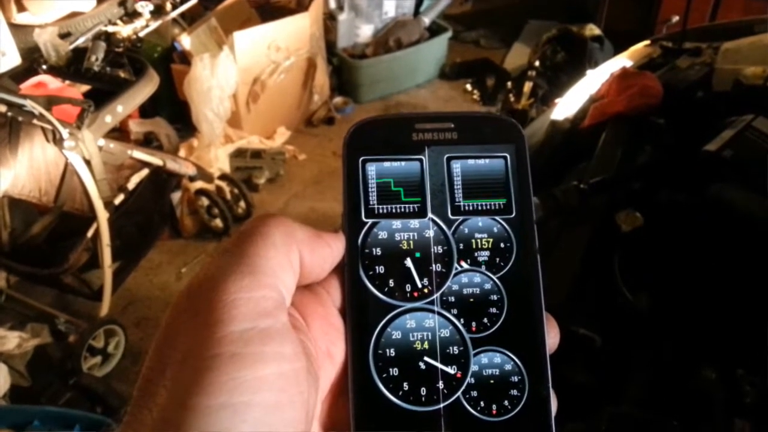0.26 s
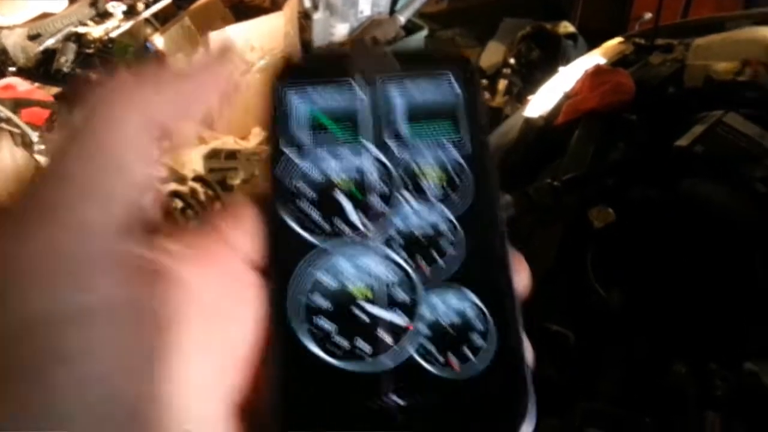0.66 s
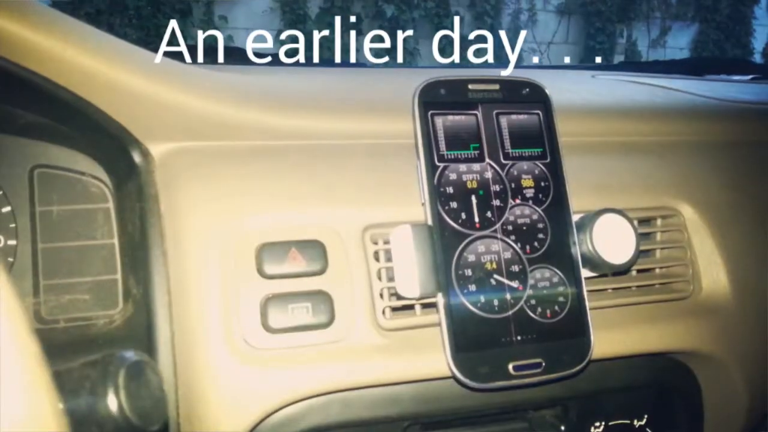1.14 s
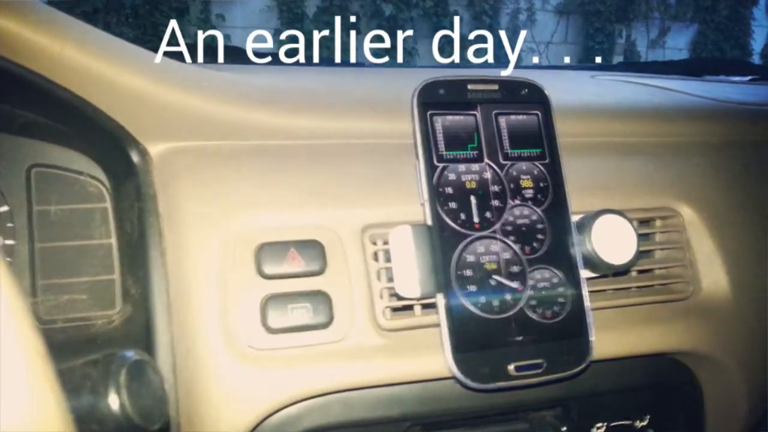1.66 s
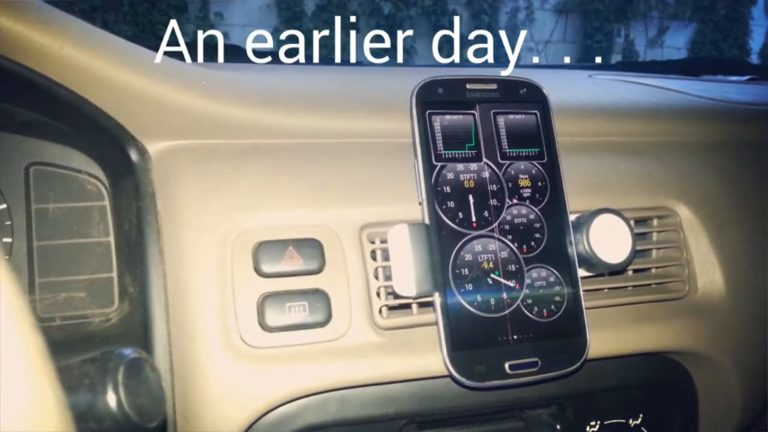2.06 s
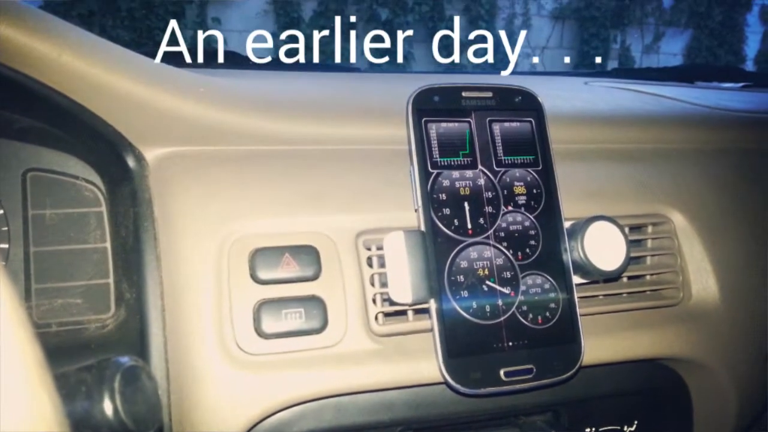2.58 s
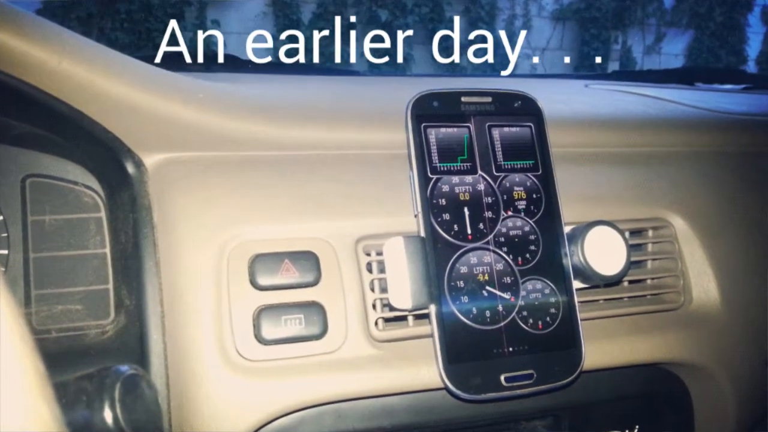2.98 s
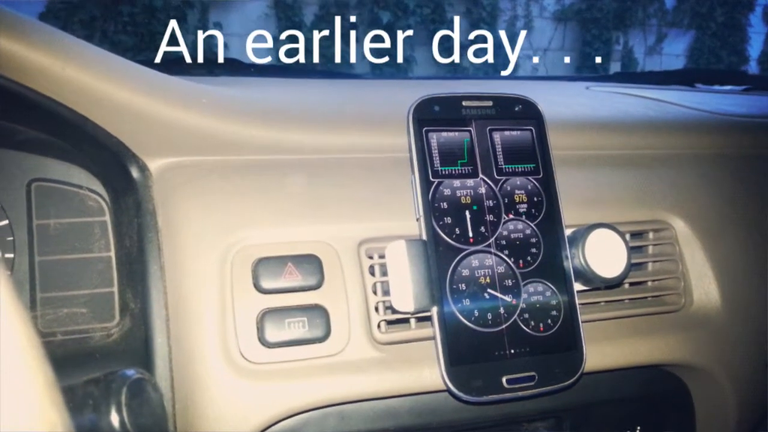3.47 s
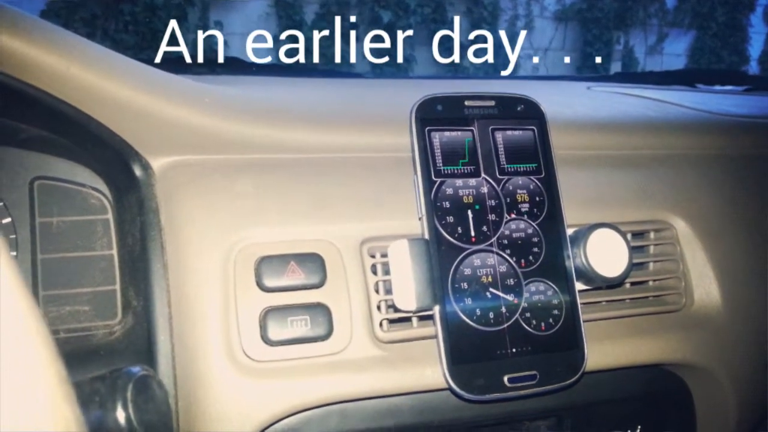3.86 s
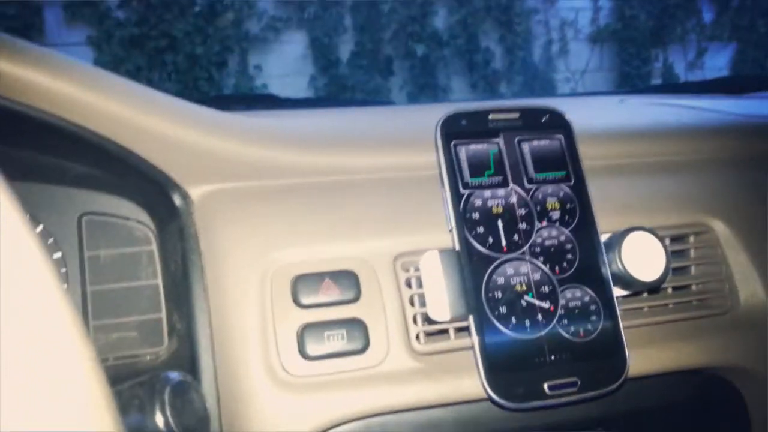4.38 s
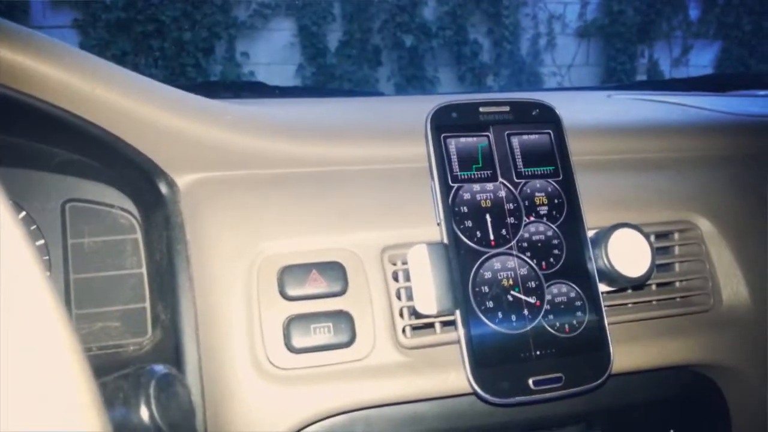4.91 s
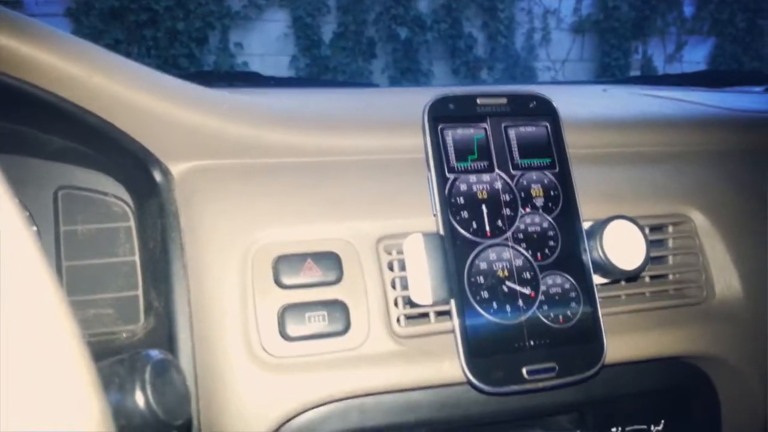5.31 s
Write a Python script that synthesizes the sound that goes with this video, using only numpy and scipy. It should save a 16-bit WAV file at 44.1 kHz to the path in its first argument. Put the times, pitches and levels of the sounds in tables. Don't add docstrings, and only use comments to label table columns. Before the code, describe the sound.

From 0 to about 0.8 seconds a four-cylinder engine idles fast and loud, close by in a garage: a rough, buzzing hum under dense valve clatter and ringing metal, creeping up very slightly. It stops dead. Silence lasts until about 1.2 seconds, then the engine fades in over roughly 0.3 seconds, far quieter, slower and muffled, heard inside the car. A low, throbbing drone booms through the body, with faint dashboard buzz, floor rumble and soft vent hiss. The pitch sags gently until about 4.8 seconds, its upper drone weakening, then recovers a little. The hand-held camera's small microphone catches handling: a sharp, dry tick at 1.86, a barely audible touch at 3.9, a soft tick with a dull thump at 4.16, and faint low finger rubbing afterward. At 5.33 a hard knock lands, followed by a snap and thump at 5.39, as the idle continues to the end.

```python
import sys
import numpy as np
from scipy import signal
from scipy.io import wavfile
from scipy.ndimage import uniform_filter1d, map_coordinates

SR = 44100
rng = np.random.default_rng(int(sys.argv[2]) if len(sys.argv) > 2 else 0)


def put_to_file(sound):
    columns = np.atleast_2d(sound).T
    safe = np.clip(columns, -1, 1)
    whole_steps = np.round(safe * 32767)
    wavfile.write(sys.argv[1], SR, whole_steps.astype(np.int16))


def invert_db(level):
    return 10 ** (np.asarray(level, dtype=float) / 20)


N = 244701
CUT_S, START_S, FADE_S = 0.836, 1.214, 0.3


def evened(x):
    return x / np.sqrt(np.mean(x ** 2) + 1e-20)


def step(at_s, rise_s):
    return np.clip((np.arange(N) / SR - at_s) / rise_s + 0.5, 0, 1)


def wander(hz):
    coarse = np.arange(0, N + 256, 256)
    curve = map_coordinates(rng.standard_normal(400), [coarse / SR * 2 * hz], order=3, mode="wrap")
    return np.interp(np.arange(N), coarse, evened(curve))


def noise(shape, patchy_db):
    hz = np.fft.rfftfreq(2048, 1 / SR)
    shape_hz, shape_db = np.transpose(shape)
    real, imag, patches = rng.standard_normal((N // 512 + 6, 1025, 3)).T
    patches = uniform_filter1d(patches, size=14, axis=0)
    patches = evened(uniform_filter1d(patches, size=7, axis=1))
    colour_db = np.interp(np.log(hz + 1), np.log(shape_hz + 1), shape_db, right=-120)[:, None]
    spectrum = (real + 1j * imag) * invert_db(colour_db + patchy_db * patches)
    return evened(signal.istft(spectrum, nperseg=2048, noverlap=1536)[1][:N])


def resonate(x, hz, width_hz):
    r = np.exp(-np.pi * width_hz / SR)
    return evened(signal.lfilter([1, 0, -1], [1, -2 * r * np.cos(2 * np.pi * hz / SR), r * r], x))


def ring_modes(x, modes, widen):
    out = np.zeros(N)
    for hz, width_hz, db in modes:
        once = resonate(x, hz, widen * width_hz)
        out += invert_db(db) * resonate(once, hz, widen * width_hz)
    return out


def orders(firings, table, scatter):
    out = np.zeros(N)
    for multiple, db, waver_db in table:
        cycles = multiple * firings + scatter * (rng.random() - 0.5)
        out -= invert_db(db + waver_db * wander(7)) * np.sqrt(2) * np.cos(2 * np.pi * cycles)
    return out


def throb(firings, firing_db, cam_db, lag):
    firing_beat = firing_db * np.cos(2 * np.pi * firings)
    cam_beat = cam_db * np.cos(2 * np.pi * (firings / 4 - lag))
    return evened(invert_db(firing_beat + cam_beat))


# multiple of firing rate, start level/dB, drift/(dB/s), camshaft beat/dB
GARAGE_MAIN = [(2, -29.5, -1.5, 2), (3, -28, 5.5, 0.99), (5, -18.5, -4, 0.43)]
# multiple of firing rate, level/dB, waver/dB
GARAGE_ORDERS = [(4, -40, 2), (6, -44, 3), (7, -44, 3), (8.5, -43, 3), (10, -38, 3), (11, -34, 1.5),
                 (12, -43, 3), (20, -43, 3), (14.1, -35.5, 1.5), (16.8, -34, 1.5), (29.2, -37, 3),
                 (33, -39, 4), (33.85, -37, 4), (40, -38, 5)]


def garage_tones(firings):
    t = np.arange(N) / SR
    cam = np.cos(2 * np.pi * (firings / 4 - 0.92))
    main = [(k, db + drift * t + beat_db * cam, 0.6) for k, db, drift, beat_db in GARAGE_MAIN]
    locked = firings + 0.27
    exhaust = orders(locked, main[:2], scatter=0) - orders(locked, main[2:], scatter=0)
    return exhaust + orders(firings, GARAGE_ORDERS, scatter=0.64)


# f/Hz, level/dB per Hz
CLATTER = [(18, -46), (40, -23.5), (91, -14.5), (148, -18), (246, -14), (418, -12.5), (929, -17),
           (1300, -17), (2060, -16), (3000, -20.5), (3900, -18), (5500, -24.5), (9700, -28), (14700, -20)]
# f/Hz, width/Hz, level/dB
BLOCK = [(440, 54, -0.5), (1104, 60, 4), (1305, 41, 3.5), (1550, 33, -3), (1757, 40, -5.5), (1946, 26, 0),
         (2134, 52, 2), (2270, 70, -4.5), (2580, 31, -8.5), (2964, 15, -7.5), (3847, 47, -2),
         (4230, 110, -5), (4460, 330, -3)]


def garage_clatter(firings):
    tap_rate_hz = 6000
    taps = invert_db(1.7 * rng.exponential(1, N)) * (rng.random(N) < tap_rate_hz / SR) * rng.standard_normal(N)
    rings = evened(ring_modes(taps, BLOCK, widen=2))
    clatter = invert_db(-1.5) * noise(CLATTER, 1.4) + invert_db(-3.5) * rings
    level_db = -19.5 + 2 * np.arange(N) / SR
    return invert_db(level_db) * throb(firings, 0.24, 0.69, 0.27) * clatter


def garage():
    start_hz, creep_hz_per_s = 38.4, 0.3
    firings = np.cumsum(start_hz + creep_hz_per_s * np.arange(N) / SR) / SR
    return garage_tones(firings) + garage_clatter(firings)


# t/s, firing rate/Hz
CABIN = [
    (1.4, 33.12),
    (2.2, 32.88),
    (3.1, 32.47),
    (3.7, 32.0),
    (4.3, 31.85),
    (4.8, 31.4),
    (5.5, 31.95),
]


def cabin_rate_hz():
    at_s, rate_hz = np.transpose(CABIN)
    return uniform_filter1d(np.interp(np.arange(N) / SR, at_s, rate_hz), size=16000)


# multiple of firing rate, level/dB, waver/dB
CABIN_ORDERS = [(1, -72.5, 1.5), (5, -49, 1.1), (7, -52, 4.4), (11, -51.5, 3.1), (16.5, -61, 3)]
# multiple of firing rate, level re third/dB, waver/dB
FADING_ORDERS = [(4, -12.5, 2), (9, -16.5, 2)]
# multiple of firing rate, level/dB, waver/dB, 1 = loaded, 0 = unloaded
LOADED_ORDERS = [(14, -50.5, 2.7, 1), (15, -50.5, 2.6, 0)]


def cabin_boom(rate_hz, firings):
    load = step(4.05, 0.091)
    near_db = 3 * step(5.33, 0.03)
    flank_hz, flank_width_hz = 32.15, 0.25
    second_db = -36 + 1.4 * load + near_db
    third_db = -37 + 3 * np.tanh((rate_hz - flank_hz) / flank_width_hz) + near_db
    boom = orders(firings, [(2, second_db, 0.88), (3, third_db, 0.73)] + CABIN_ORDERS, scatter=0.37)
    fading_db = third_db + 4 * (rate_hz - flank_hz)
    boom += invert_db(fading_db) * orders(firings, FADING_ORDERS, scatter=0.58)
    for multiple, db, waver_db, loaded in LOADED_ORDERS:
        gate = load if loaded else 1 - load
        boom += gate * orders(firings, [(multiple, db, waver_db)], scatter=0.82)
    return boom


def add_at(out, at_s, sound):
    out[round(at_s * SR):][:len(sound)] += sound


# t/s, peak/dB, struck centre f/Hz, spread/octaves
TICKS = [
    (1.856, -11, 2670, 0.13),
    (3.896, -46, 3980, 1),
    (4.158, -39, 2000, 1),
    (5.3291, -9, 1776, 1.66),
    (5.339, -30, 3200, 0.73),
    (5.375, -32, 1800, .6),
]
# f/Hz, level/dB, t60/s
SHELL = [(1320, -6.5, 0.0096), (1695, 6.5, 0.00335), (2050, -8, 0.011), (2830, -23, 0.009),
         (3200, -5.5, 0.006), (4130, -1, 0.0051), (5580, 1.5, 0.0043), (6950, -12, 0.004),
         (8760, -6, 0.0047), (11100, -3, 0.0028)]


def ticks():
    out, t = np.zeros(N + SR), np.arange(3000) / SR
    small = signal.butter(6, 1050, "high", fs=SR, output="sos")
    onset = 1 - np.exp(-t / 0.00019)
    for at_s, peak_db, centre_hz, spread in TICKS:
        ring = np.zeros(len(t))
        for hz, db, t60_s in SHELL:
            off_centre_db = 9 * abs(np.log2(hz / centre_hz)) / spread
            ring += invert_db(db - off_centre_db - 60 * t / t60_s) * np.sin(2 * np.pi * hz * t)
        add_at(out, at_s, signal.sosfilt(small, invert_db(peak_db + 4.0) * ring * onset))
    return out[:N]


# t/s, level/dB, f/Hz, echo delay/ms
SNAPS = [
    (1.8545, -17.5, 3700, .165),
    (5.3888, -19.5, 6500, .317),
]


def snaps():
    out, t = np.zeros(N + SR), np.arange(3000) / SR
    decay_cycles, echo_gain = 0.61, 0.74
    for at_s, db, hz, echo_ms in SNAPS:
        cycles = [np.maximum(t - delay_s, 0) * hz for delay_s in (0, echo_ms / 1000)]
        first, echo = (np.sin(2 * np.pi * u) * np.exp(-u / decay_cycles) for u in cycles)
        add_at(out, at_s, invert_db(db) * (first - echo_gain * echo))
    return out[:N]


# t/s, level/dB, f/Hz
THUMPS = [
    (1.8558, -35, 198),
    (4.1557, -18.5, 390),
    (5.3301, -14.5, 164),
    (5.3892, -21, 505),
]


def thumps():
    out, t = np.zeros(N + SR), np.arange(3000) / SR
    onset = 1 - np.exp(-t / 0.00076)
    for at_s, db, hz in THUMPS:
        add_at(out, at_s, 1.4 * invert_db(db - 60 * t * hz / 6) * np.sin(2 * np.pi * hz * t) * onset)
    return out[:N]


# t/s, length/s, f/Hz, width/Hz, level/dB
RUSTLES = [(2.45, 0.079, 7760, 800, -57.5), (4.264, 0.088, 3495, 2000, -51),
           (4.663, 0.047, 5000, 3000, -52), (4.83, 0.23, 7900, 800, -59.5), (5.31, .06, 2500, 3000, -47),
           (5.41, 0.12, 2500, 3000, -49), (1.87, 0.093, 158, 60, -40), (4.493, 0.19, 167, 60, -37),
           (4.84, 0.45, 159.3, 60, -41), (5.155, 0.39, 144, 60, -40.5), (5.45, 0.25, 299, 250, -41.5)]


def rustles():
    out, t = np.zeros(N), np.arange(N) / SR
    for at_s, length_s, hz, width_hz, db in RUSTLES:
        swell = np.exp(-((t - at_s) / length_s * 2) ** 2)
        out += invert_db(db) * resonate(rng.standard_normal(N), hz, width_hz) * swell
    return out


# f/Hz, width/Hz, level/dB
PANELS = [(352, 51, -54), (688.3, 38, -54.5), (880, 46, -61.5), (1073, 40, -62), (1247, 120, -54.5),
          (1317, 58, -54.5), (1395, 64, -54), (1627, 35, -66.5), (1953, 55, -65.5), (2500, 110, -63),
          (3900, 500, -64), (13600, 30, -78)]


def panel_buzz(firings):
    shake = rng.standard_normal(N) * throb(firings, 2.5, 3.2, 0.24)
    return ring_modes(shake, PANELS, widen=1.02)


# f/Hz, level/dB per Hz
RUMBLE = [(12, -43), (20, -10), (40, -13), (76, -4.5), (143, -4.5), (476, -12), (565, -17.5), (682, -14.5),
          (809, -27), (1200, -28), (1560, -47), (2640, -120)]


def rumble(firings):
    return invert_db(-39 + 0.71 * wander(4)) * noise(RUMBLE, 1.5) * throb(firings, 0.17, 0.74, 0.28)


# f/Hz, level/dB per Hz
HISS = [(350, -37.5), (600, -4), (800, -6), (1130, -10), (1700, -11.5), (2430, -14.5), (2900, -16),
        (4200, -17), (4500, -21), (8400, -22.5), (9600, -26.5), (11300, -25), (14700, -28.5)]


def vent_hiss():
    return invert_db(-46.5 + 0.6 * wander(12)) * noise(HISS, 1.5)


def cabin():
    rate_hz = cabin_rate_hz()
    firings = np.cumsum(rate_hz) / SR + 1.11
    handling = ticks() + snaps() + thumps() + rustles()
    background = panel_buzz(firings) + rumble(firings) + vent_hiss()
    return cabin_boom(rate_hz, firings) + handling + background


def scene():
    t = np.arange(N) / SR
    cut = np.clip((CUT_S - t) / 0.0023, 0, 1)
    fade = np.clip((t - START_S) / FADE_S + 0.056, 0, 1) * (t > START_S)
    return (garage() * cut + cabin() * fade)[None]


# f/Hz, single lines in garage/1, patches in cabin/1
SURVIVE = [(3000, 1, 1), (8000, 1, .975), (9400, 1, .95), (9750, .1, .89), (10250, .001, .92),
           (10800, .035, .95), (11400, .06, .95), (12000, .16, .93), (12700, .08, .94), (13600, .03, .91),
           (14200, .003, .88), (14500, .015, .75), (14620, 0, -1)]


def starve(x):
    window = signal.windows.kaiser_bessel_derived(2048, 4 * np.pi)
    hz, t, z = signal.stft(np.pad(x, ((0, 0), (10, 0))), SR, window, nperseg=2048, noverlap=1024)
    bin_hz = hz[:, None]
    share_hz, lines, patches = np.transpose(SURVIVE)
    chance, clump = (np.repeat(rng.random((129, len(t))), 8, axis=0)[:1025] for _ in range(2))
    wide = np.repeat(rng.random((43, len(t) // 2 + 1)), 24, axis=0)
    wide = np.repeat(wide, 2, axis=1)[:1025, :len(t)]
    chance = np.maximum(chance - 0.02, wide - 0.03)
    clumped = np.interp(hz, share_hz, lines)[:, None] * np.where(bin_hz > 9600, 4 * clump ** 3, 1)
    keep_lines = rng.random(chance.shape) < clumped
    keep_patches = chance < np.interp(hz, share_hz, patches)[:, None]
    keep = np.where(t < START_S, keep_lines, keep_patches)
    power = abs(z[0]) ** 2
    treble = power[hz > 1000].sum(axis=0)
    sudden = (t > START_S) & (treble > 12 * np.median(treble[t > START_S]))
    valley = uniform_filter1d(power, size=6, axis=0) < 0.35 * uniform_filter1d(power, size=70, axis=0)
    keep = keep & ~(sudden & valley & (bin_hz > 3600))
    return signal.istft(z * keep, SR, window, nperseg=2048, noverlap=1024)[1][:, 10:N + 10]


def band_limit(x):
    return signal.sosfilt(signal.butter(12, 14690, fs=SR, output="sos"), x)


def record(dry):
    thin = signal.sosfilt(signal.butter(2, 30, "high", fs=SR, output="sos"), dry)
    t = np.arange(N) / SR
    mix = starve(thin) * ((t < CUT_S) | (t > START_S))
    return band_limit(mix)


dry = scene()
out = record(dry)
put_to_file(out)
```